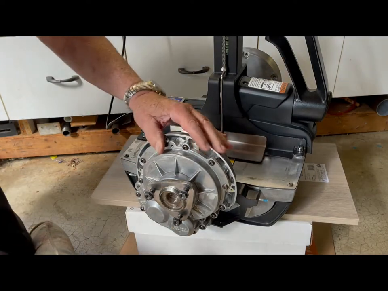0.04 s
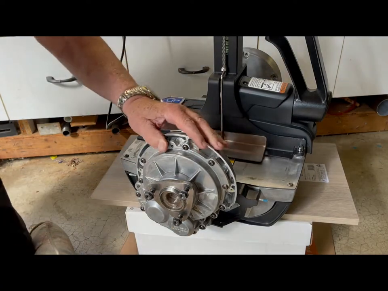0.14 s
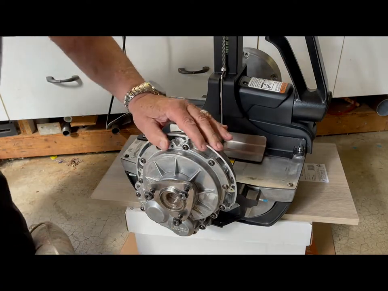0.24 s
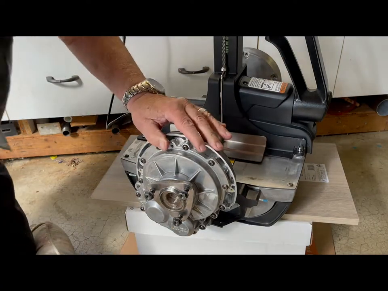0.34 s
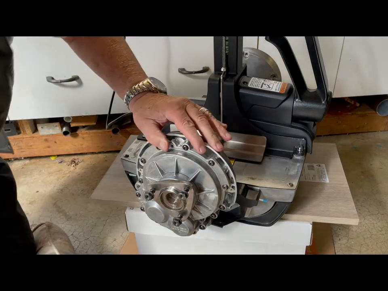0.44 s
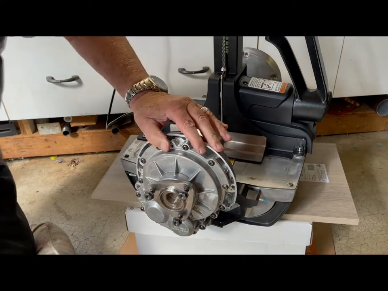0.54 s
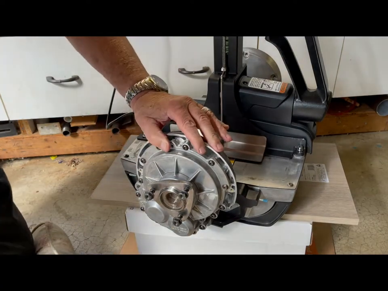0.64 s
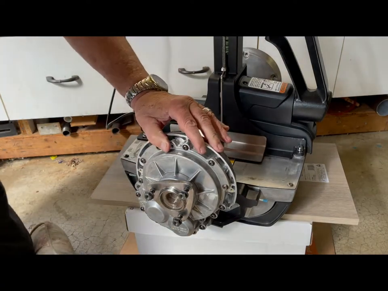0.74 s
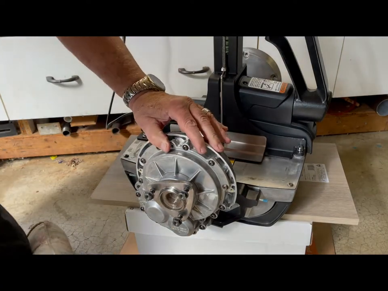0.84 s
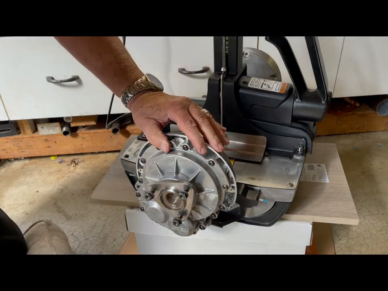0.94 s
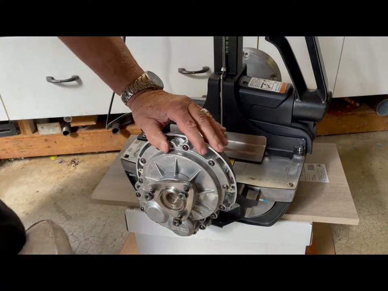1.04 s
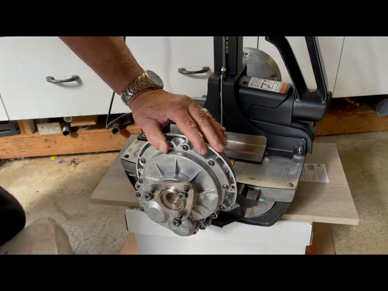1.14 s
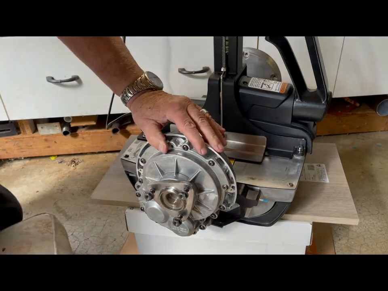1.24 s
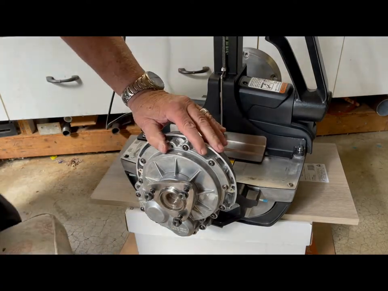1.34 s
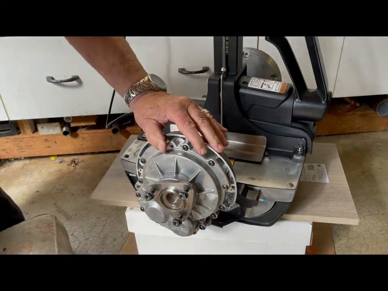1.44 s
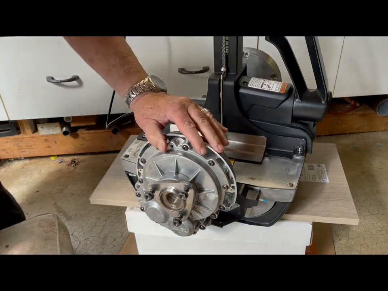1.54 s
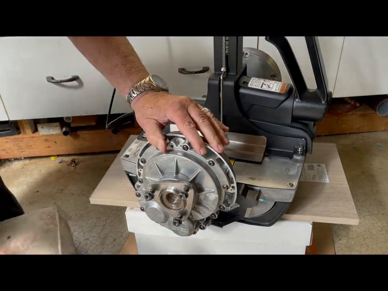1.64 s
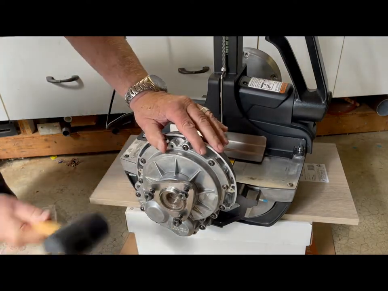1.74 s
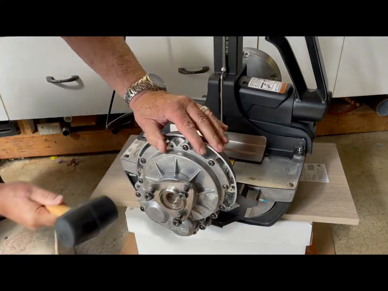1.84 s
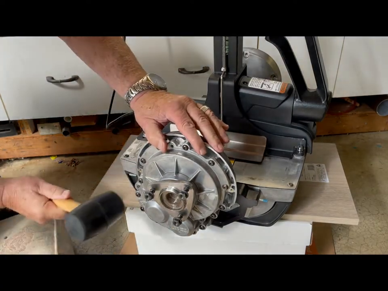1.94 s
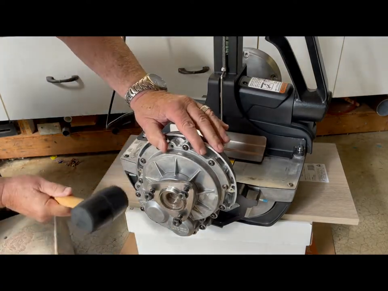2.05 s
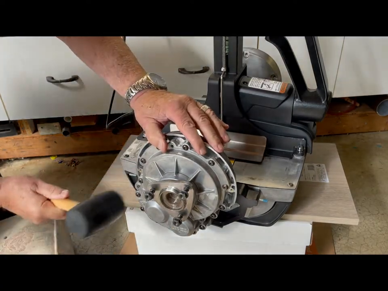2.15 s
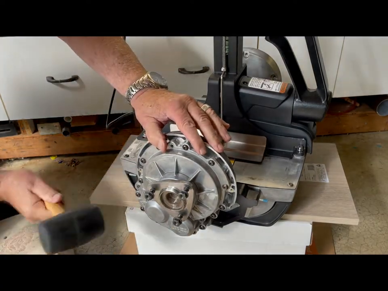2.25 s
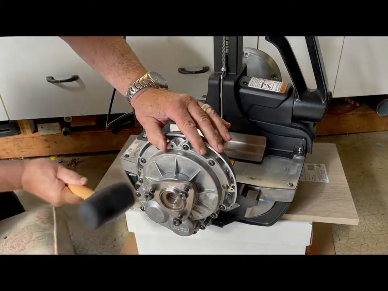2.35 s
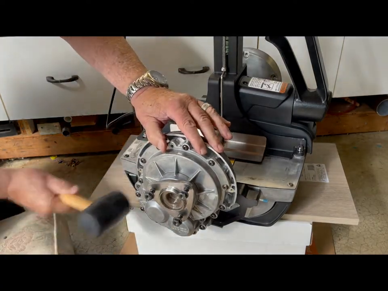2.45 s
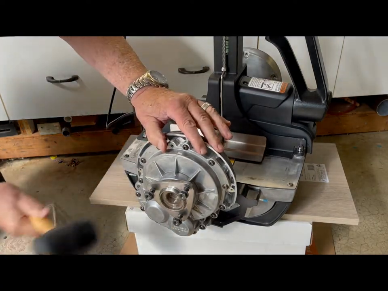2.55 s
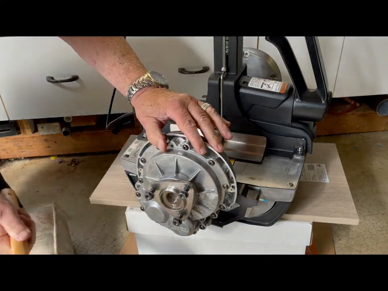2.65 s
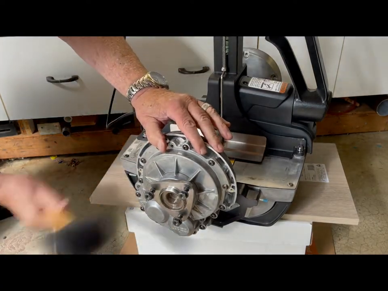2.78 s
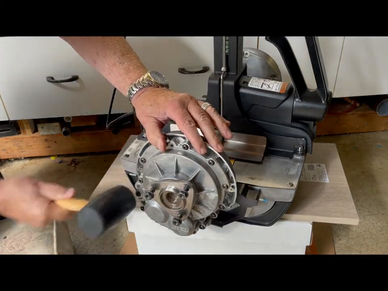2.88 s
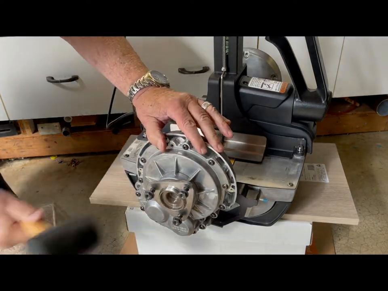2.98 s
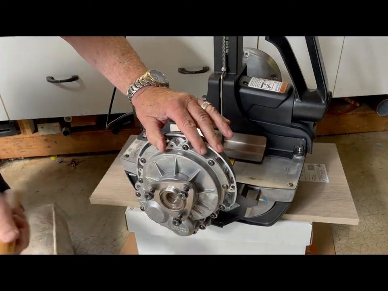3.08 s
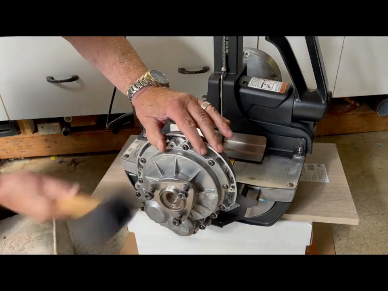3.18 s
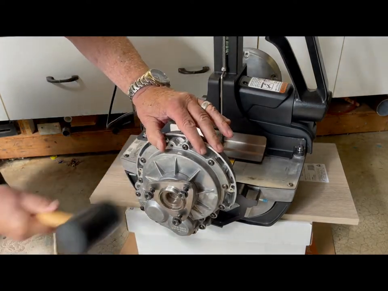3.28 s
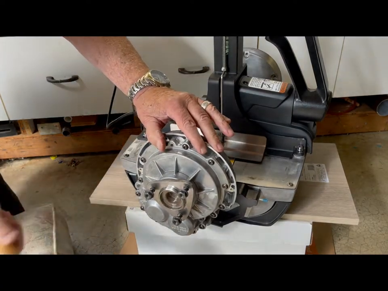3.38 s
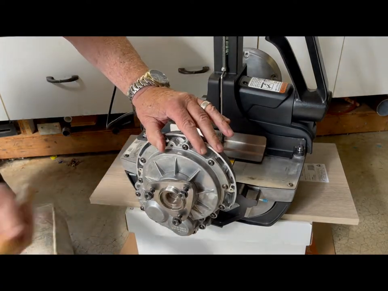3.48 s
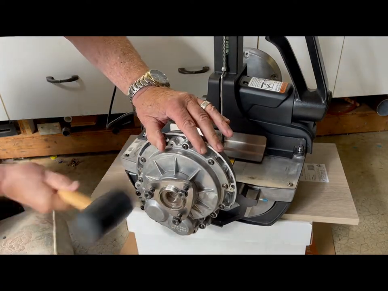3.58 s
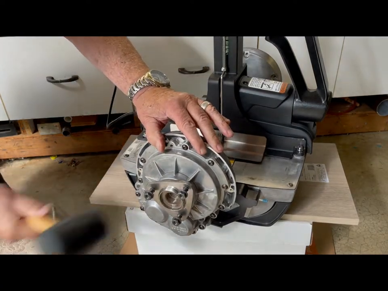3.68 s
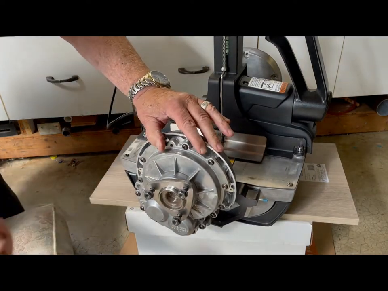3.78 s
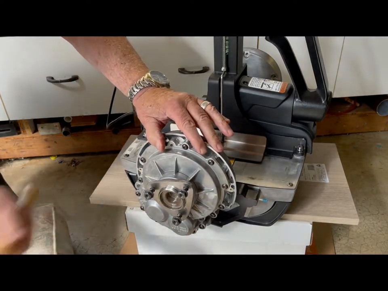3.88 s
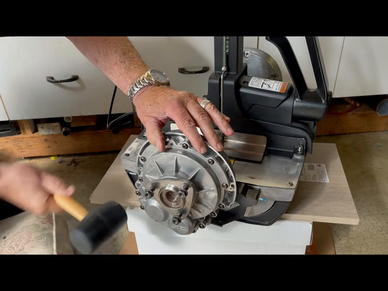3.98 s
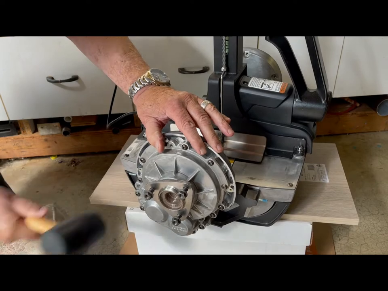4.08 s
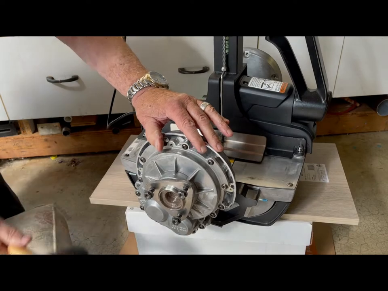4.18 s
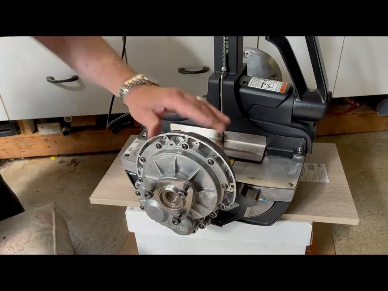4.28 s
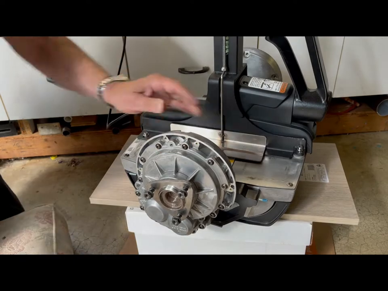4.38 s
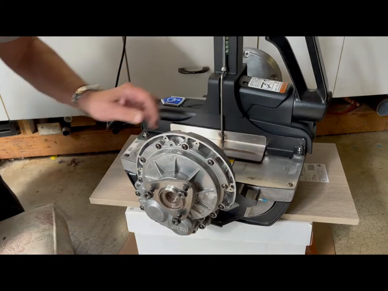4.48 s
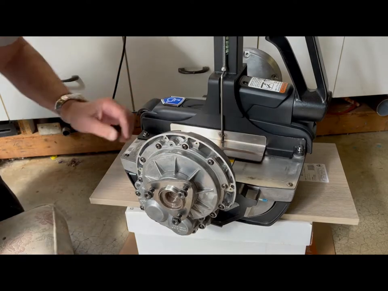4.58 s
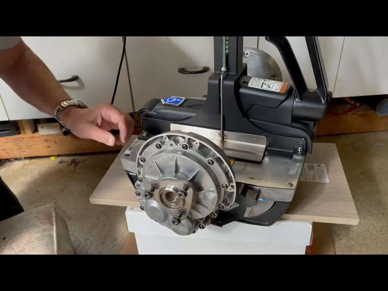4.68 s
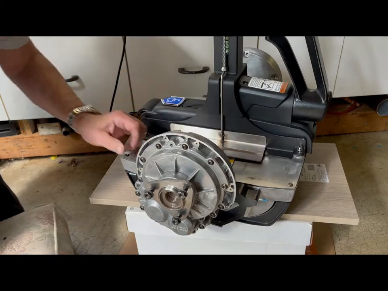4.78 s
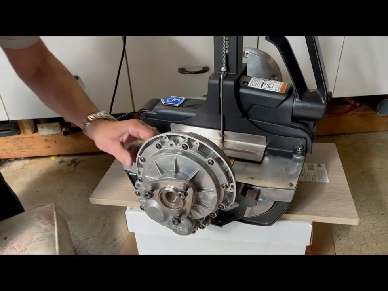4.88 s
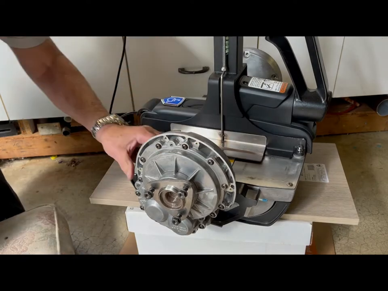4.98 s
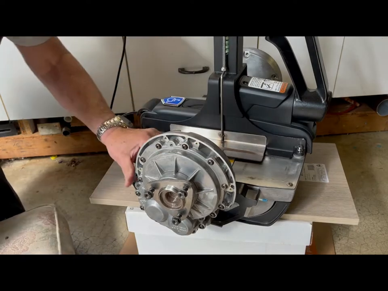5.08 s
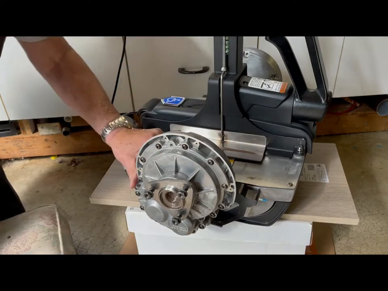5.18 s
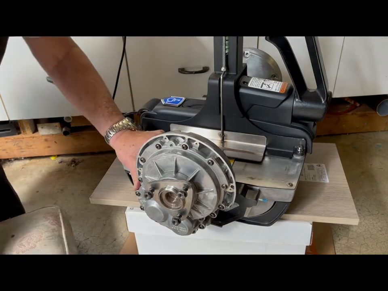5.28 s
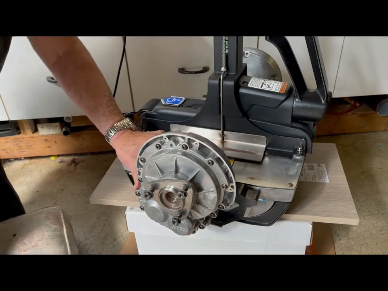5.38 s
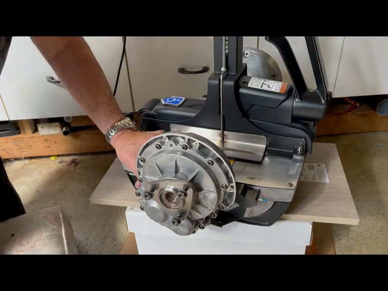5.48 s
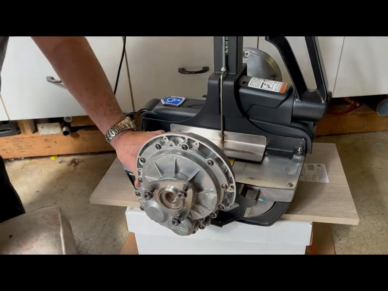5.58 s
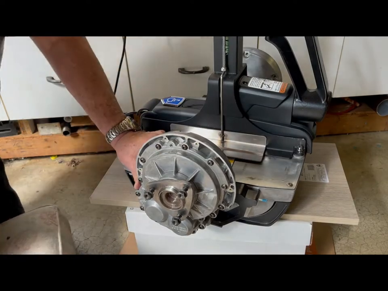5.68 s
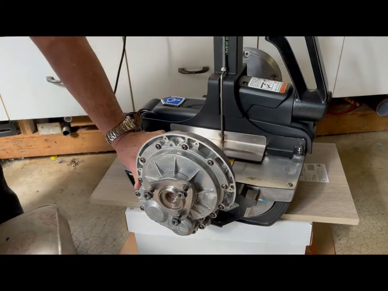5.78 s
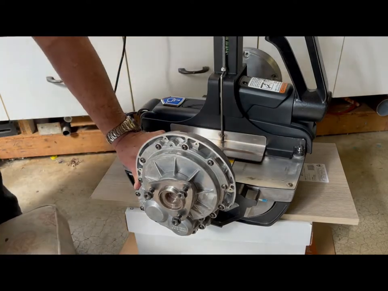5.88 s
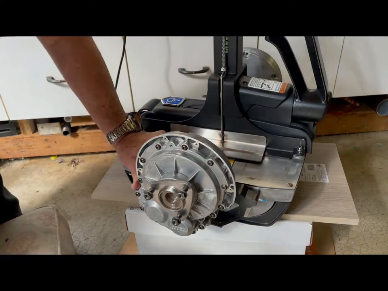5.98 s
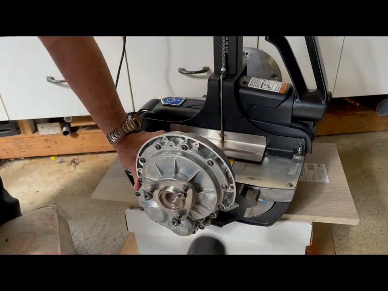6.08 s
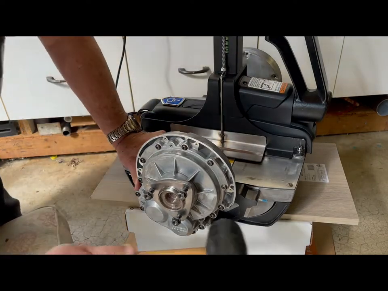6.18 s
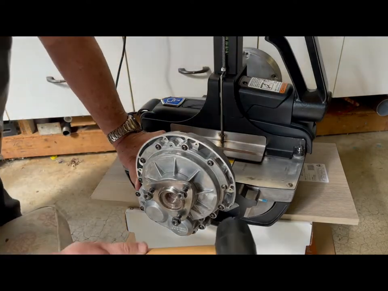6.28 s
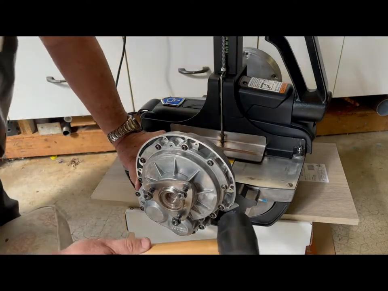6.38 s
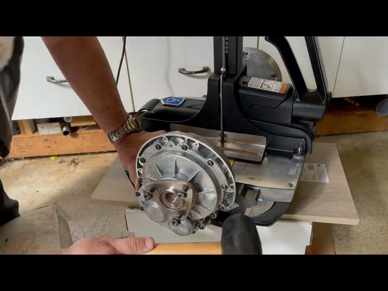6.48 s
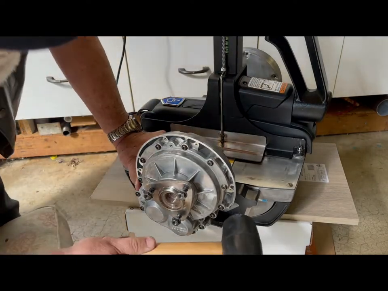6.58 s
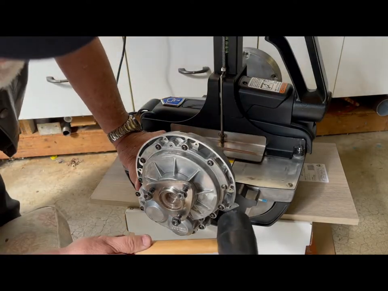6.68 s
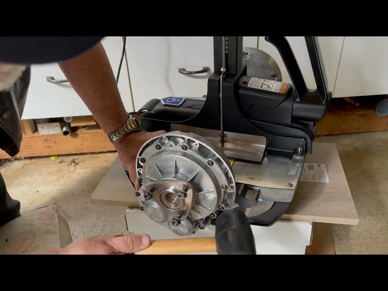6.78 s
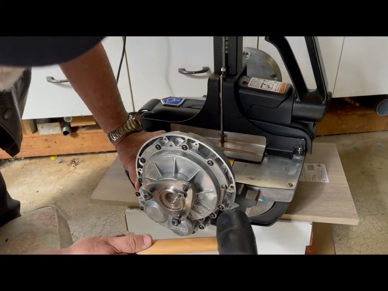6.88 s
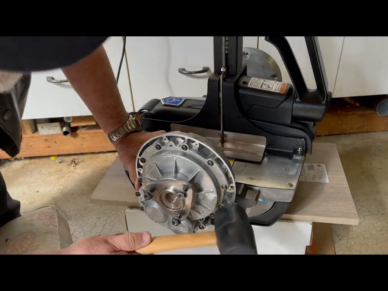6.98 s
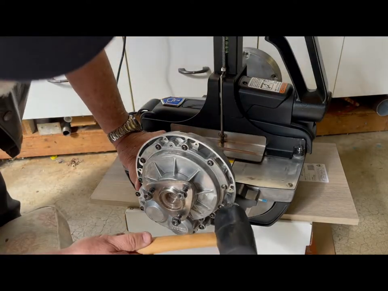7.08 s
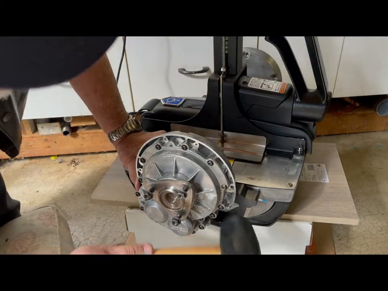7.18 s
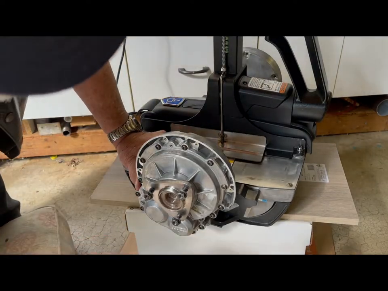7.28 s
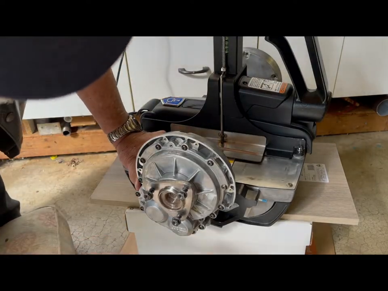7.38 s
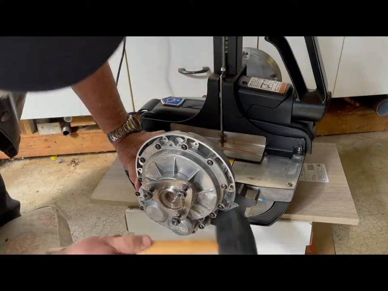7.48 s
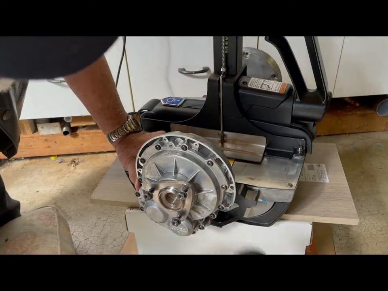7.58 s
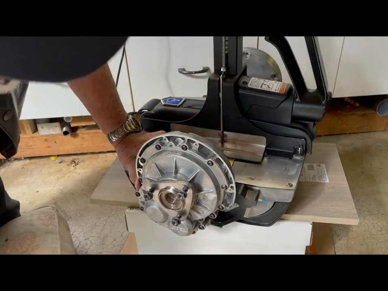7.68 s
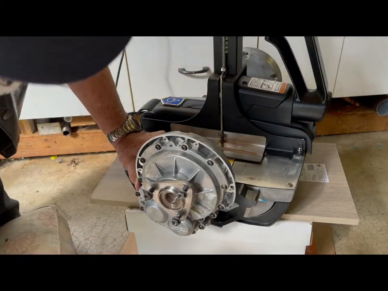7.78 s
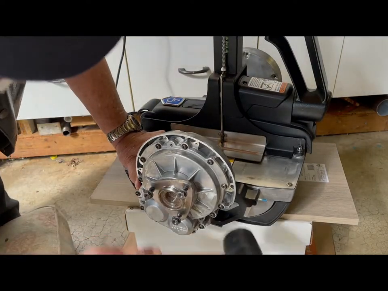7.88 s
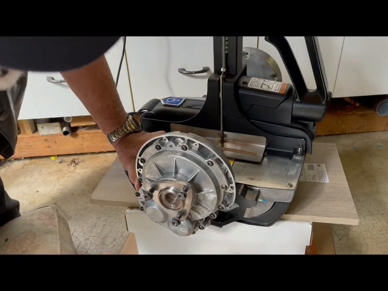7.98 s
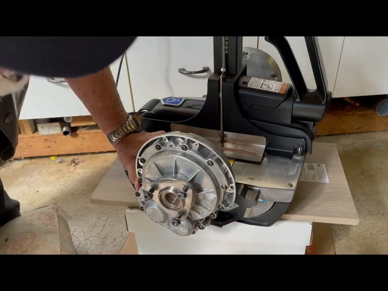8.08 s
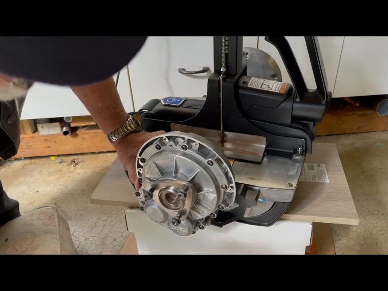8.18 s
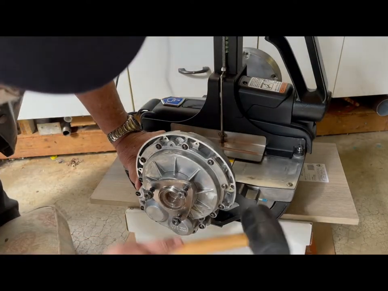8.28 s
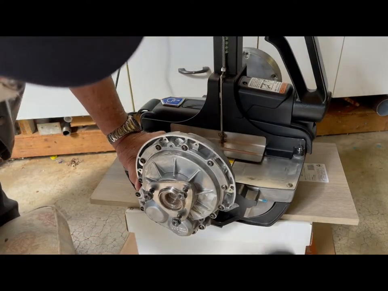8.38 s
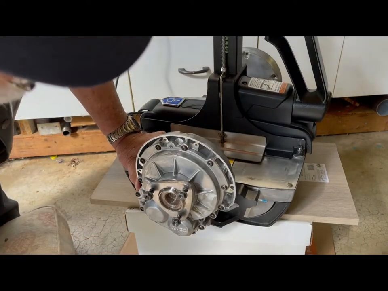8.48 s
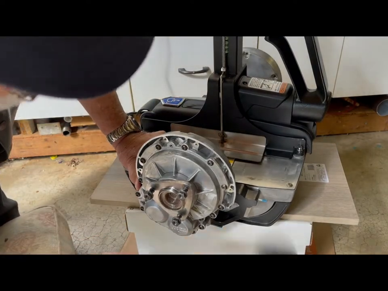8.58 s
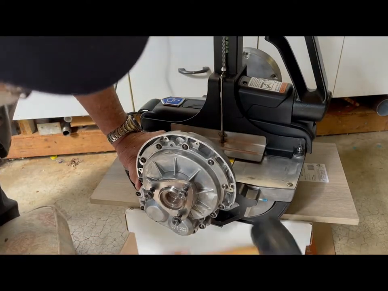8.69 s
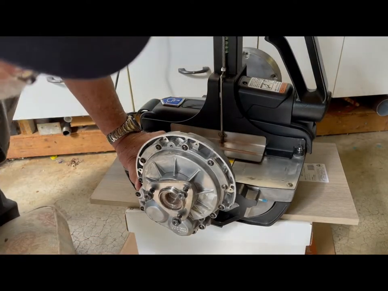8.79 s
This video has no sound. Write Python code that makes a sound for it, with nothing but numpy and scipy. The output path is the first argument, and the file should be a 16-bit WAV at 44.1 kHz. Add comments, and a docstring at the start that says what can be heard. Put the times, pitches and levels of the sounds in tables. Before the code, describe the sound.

A low, quiet rumble fills a small workshop. For the first two seconds clothes rustle and slide faintly, with a few soft bumps. At about 2.4 seconds a rubber mallet strikes a cast metal housing close by, lightly at first, then four times harder, at an even pace until 4 seconds. Each blow is a sharp knock with a rattle of loose metal parts, a short damped ring and a low thud from the stand. A very faint, thin high whistle sounds far off around 3 seconds. From 4.3 to 7 seconds there is only quiet handling: light clinks on the metal rim near 5 seconds, tiny watch band ticks, a brief palm rub and rustling cloth. The faint whistle returns around 7 seconds. From 7.5 seconds four more blows fall at the same pace, the first softer, the last at about 8.6 seconds.

```python
"""Over the low rumble of a small workshop, clothes rustle and slide, and knees and tool bump softly.
From 2.4 s a rubber mallet strikes a cast metal housing, steadied by hand on a saw table, five times.
Each blow rattles the loose metal parts, rings the damped casting and drives it down onto its stand.
A thin high whistle sounds far off. In the pause the hand clinks on the rim and the palm rubs the casting.
The whistle returns, and from 7.5 s four more blows fall."""
import sys
import numpy as np
from scipy import signal
from scipy.fft import rfft, irfft, next_fast_len
from scipy.io import wavfile
from scipy.ndimage import map_coordinates

SR = 44100
rng = np.random.default_rng(int(sys.argv[2]) if len(sys.argv) > 2 else 0)


def transcribe(signal):
    """Save signal, clipped to [-1, 1], as a 16-bit WAV file at the path in sys.argv[1]."""
    frames = np.atleast_2d(signal).T
    limited = np.clip(frames, -1, 1)
    pcm = np.round(limited * 32767).astype(np.int16)
    wavfile.write(sys.argv[1], SR, pcm)


N = 389830
NOW_S, AGE_S = np.arange(N) / SR, np.arange(SR) / SR  # scene clock, event clock

# room air: t/s, level/dB
AIR_LEVELS = [(2.2, -66), (6.23, -61.5), (6.91, -60.5), (8.6, -58.5)]
# room noise spectra: f/Hz, density/dB
RUMBLE_SPECTRUM = [(15, -55.5), (25, -26), (43, -6), (75, -5), (108, -0.5), (128, -2.5), (147, -12.5),
                   (179, -8), (236, -13), (275, -9.5), (401, -16.5), (584, -21), (700, -25.5), (910, -50.5),
                   (1540, -120)]
AIR_SPECTRUM = [(200, -25.5), (500, -1.5), (900, 4.5), (1400, -2), (2200, -12), (4000, -26.5), (8000, -34),
                (14000, -51.5)]
# room decay: f/Hz, t60/s
ROOM_DECAY = [(80, 0.59), (250, 0.22), (1000, .3), (3000, 0.27), (10000, 0.33), (13500, 0.047)]
# diffuse field: f/Hz, left-right coherence
COHERENCE = [(60, 1), (150, .88), (380, 0.27), (950, 0.079), (2400, 0.28), (6000, 0.73), (10000, 0.48)]
# far whistles: t/s, level/dB, f/Hz
WHISTLE_NOTES = [(3.1, -65, 7930), (3.16, -63, 8050), (3.39, -65.5, 8130), (6.99, -62.5, 8160),
                 (7.08, -62, 8310), (7.17, -59, 8330)]

# body shifting in its clothes: t/s, level/dB, half length/s, hiss over rustle/dB
BODY_MOVES = [(.02, -65, 0.11, 5.5), (.24, -62.5, 0.12, 5), (.41, -62, 0.11, 6), (.88, -65, 0.14, 1),
              (1.1, -55.5, 0.086, 3.5), (1.42, -63.5, 0.11, 4.5), (1.75, -63, 0.12, 6),
              (2.02, -67, 0.059, 2), (4.3, -81, .08, 10.5), (4.57, -68.5, 0.13, 1), (4.99, -66, 0.067, 7.5),
              (5.21, -60.5, 0.12, 4.5), (5.45, -65.5, 0.098, 4), (5.77, -60.5, 0.091, 6),
              (6.19, -68, 0.077, 5), (6.45, -84.5, 0.15, 7.5), (7.0, -72.5, 0.069, -13.5)]
# sleeve brushes: t/s, level/dB, half length/s
SLEEVE_BRUSHES = [(0.23, -50, .05), (0.497, -47.5, 0.084), (1.075, -51.5, 0.094), (1.176, -46.5, 0.034),
                  (1.648, -47, 0.056), (5.828, -65, 0.12)]
# cloth sliding on cloth: t/s, level/dB, rib rate/Hz
CLOTH_SLIDE = [(.93, -59, 176), (1.0, -38, 300), (1.04, -36.5, 340), (1.08, -34, 380), (1.11, -31, 560),
               (1.155, -33.5, 860), (1.19, -38, 840), (1.215, -47, 850), (1.24, -70, 580)]
# cloth spectra: f/Hz, density/dB
RUSTLE_SPECTRUM = [(500, -17.5), (1500, 0), (3000, -3), (6500, -6.5), (9000, -9), (14000, -26)]
HISS_SPECTRUM = [(4000, -43), (7000, -9.5), (8800, 0.5), (11000, 3), (11900, -9.5), (12700, -34.5)]
SLEEVE_SPECTRUM = [(100, -14), (280, -0.5), (700, -5.5), (1500, -18), (3000, -18.5), (7000, -21.5),
                   (10000, -13), (14000, -30)]

# palm on the casting: t/s, level/dB, half length/s
PALM_RUBS = [(4.575, -72, 0.072), (5.797, -58, 0.044), (6.197, -74, 0.089)]
# resonances under the palm: f/Hz, width/Hz, level/dB
PALM_MODES = [(2980, 130, -1), (4000, 100, -1), (5590, 38, 5), (6580, 110, 1), (7400, 62, -3)]
# touches on the rim: t/s, level/dB, rise/s, favoured f/Hz
RIM_CLINKS = [(2.415, -52.5, .002, 4400), (4.484, -60.5, 0.0035, 5230), (4.57, -63, .01, 3360),
              (5.008, -40.5, 0.0018, 1540), (5.025, -47, 0.0023, 1640), (5.171, -45.5, 0.0065, 3900),
              (5.181, -50, 0.0065, 2570)]
# metal watch band: t/s, level/dB
BAND_TICKS = [(0.481, -50), (2.019, -61), (2.077, -61.5), (4.372, -64), (4.434, -60), (4.651, -61),
              (5.816, -50.5)]
# body and tool bumps: t/s, level/dB, f/Hz, t60/s
SOFT_BUMPS = [(.191, -40.5, 172, 0.13), (.192, -50.5, 650, .04), (0.242, -36, 129, 0.056),
              (.268, -36, 45, 0.67), (0.34, -43.5, 167, 0.11), (.465, -37, 240, 0.34),
              (0.767, -54, 920, 0.049), (1.135, -36, 183, 0.042), (1.178, -37.5, 268, 0.086),
              (1.395, -43.5, 55, 0.063), (1.612, -39, 260, 0.15), (2.413, -39, 416, 0.069),
              (4.455, -48.5, 620, 0.1), (5.285, -51.5, 480, 0.072), (7.025, -45, 218, 0.13)]

# modes of the struck parts: f/Hz, level/dB, t60/s before extra damping
STAND_MODES = [(76, -1, 0.31), (112, -5, .12), (145, -1, 0.12)]
BOARD_MODES = [(172, 1, 0.13), (222, -6.5, 0.14), (253.1, 2.5, .11), (305, 1.5, 0.083),
               (318.2, -4.5, 0.056)]
CASTING_MODES = [(370, -7, 0.066), (459, -7, 0.087), (517, -2.5, 0.021), (571.3, -1, .06),
                 (645.7, -4.5, 0.064), (685, -1, 0.029), (784.4, -6.5, 0.069), (823, -6.5, 0.063)]
RIM_MODES = [(887, 1.5, .06), (968.6, 2, 0.062), (1081, -5, 0.11), (1199, 1, 0.072), (1316, -3, 0.14),
             (1371, -2, 0.09), (1518, -2.5, 0.058), (1695, -5.5, 0.039), (1962, -1, 0.063),
             (2125, -8.5, 0.091)]
CLINK_MODES = [(1520, 2.5, 0.08), (1725, 0, .15), (2051, -3, 0.21), (2610, -7, .16), (2960, -4.5, 0.22),
               (3400, -8, 0.13), (3820, -9.5, 0.24), (5300, -8, 0.2)]
LOOSE_PART_MODES = [(2240, -5, .04), (2320, 2.5, 0.019), (2900, -2.5, 0.085), (2935, 4.5, .05),
                    (2990, 0, .035), (3370, -0.5, 0.023), (3804, -2, .05), (4060, -1, .04),
                    (4360, -11.5, .04), (5020, 1, 0.035), (5000, 0, 0.074), (5200, -9.5, 0.14)]
FREE_METAL_MODES = [(417, 2, 0.79), (522, -0.5, 1.5), (630, -6.5, 0.37), (907, 4.5, .3), (1370, -7.5, 0.85),
                    (1560, -2.5, .3), (2030, -5.5, .45), (2420, -10, 0.36), (3700, -12.5, 0.45)]
# metal contact spectra: f/Hz, density/dB
KNOCK_SPECTRUM = [(100, -18), (250, -1.5), (550, 2), (800, 1), (1200, -24)]
CRACK_SPECTRUM = [(500, -25), (950, 1), (1400, 1.5), (2100, -5.5), (3000, -23.5)]
CLACK_SPECTRUM = [(1000, -23), (2200, 0.5), (3400, -3), (4600, -3.5), (6500, -11.5), (9000, -24)]
TICK_SPECTRUM = [(3500, -28.5), (6500, -8), (8000, -1), (9400, 3), (11000, 2.5), (12200, -5),
                 (13200, -15.5), (16000, -23)]
BUZZ_SPECTRUM = [(400, -23.5), (1000, 1.5), (2400, 2), (4000, -10.5), (7000, -17), (10000, -11.5),
                 (14000, -25)]
# mallet blows: t/s, level/dB; relative level/dB of thud, board, casting, rim, clack, tick;
# favoured f/Hz of board, casting, clack
MALLET_BLOWS = [(2.366, -11.5, -19, -10.5, -15.5, -21.5, -25.5, -28, 192, 795, 2430),
                (2.836, -2, -24, -17, -8.5, -17, -26.5, -32.5, 255, 654, 2830),
                (3.214, -3, -31, -24, -12, -11.5, -14.5, -19, 167, 643, 2520),
                (3.586, -1, -25.5, -15.5, -6, -18, -25, -25, 271, 650, 2650),
                (3.969, -1.5, -24, -16, -9.5, -17, -23, -20.5, 274, 462, 2926),
                (7.488, -7.5, -18.5, -7.5, -4.5, -18.5, -21, -24.5, 260, 580, 5350),
                (7.868, -1, -20.5, -16, -7, -14.5, -20.5, -24.5, 260, 457, 3404),
                (8.266, 1, -22, -19, -12.5, -18, -16.5, -26, 319, 430, 3160),
                (8.647, -2, -17.5, -13, -11.5, -15.5, -14, -21, 168, 410, 3680)]

# microphone port response: f/Hz, gain/dB
PORT_GAIN = [(25, -11), (60, 0), (8000, -0.5), (9900, 4.5), (10230, -6.5), (10550, 6.5), (11500, -3.5),
             (12400, -10), (13800, -25), (15500, -23)]
# left over right, before side weights: f/Hz, gain/dB
PORT_TILT = [(60, 1), (200, 1.5), (1000, 2.5), (2400, 1.4), (4400, 4), (8000, -0.5)]
# the ports resonate near 10 kHz, a little apart: f/Hz, left lead/rad before side weights
PORT_LEAD = [(1500, 0), (2600, .9), (4500, .6), (6500, .3), (7600, .8), (8500, 0), (9500, -1.8),
             (10230, -np.pi), (11200, -4.2), (12000, -5.3), (13000, -6)]


def amp(db):
    """Decibels to gain."""
    return 10 ** (np.asarray(db) / 20)


def unit(x):
    """Scale to rms 1."""
    return x / np.sqrt(np.mean(x ** 2) + 1e-20)


def burst(x):
    """Scale to the energy of 20 ms at rms 1."""
    return x / np.sqrt(np.sum(x ** 2) / (.02 * SR) + 1e-20)


def along(points, hz):
    """Read (f/Hz, value) points on a log axis."""
    f, v = np.transpose(points)
    return np.interp(np.log(hz + 1), np.log(f + 1), v)


def curves(rows):
    """One per-sample curve for each column after t/s."""
    t_s, *columns = np.transpose(rows)
    return [np.interp(NOW_S, t_s, column) for column in columns]


def wobble(rate_hz):
    """Smooth random curve with knots at rate_hz."""
    return map_coordinates(rng.standard_normal(int(N * rate_hz / SR) + 4), [NOW_S * rate_hz])


def filtered(x, response):
    """Apply a complex frequency response."""
    n = x.shape[-1]
    padded = next_fast_len(n + 8192)
    return irfft(rfft(x, padded) * response(np.fft.rfftfreq(padded, 1 / SR)), padded)[..., :n]


def resonance(hz, centre_hz, width_hz):
    """Band-pass response, gain 1 at the centre."""
    return 1j * hz * width_hz / (centre_hz ** 2 - hz ** 2 + 1j * hz * width_hz)


def coloured(x, spectrum):
    """Shape by a spectrum; rms 1."""
    return unit(filtered(x, lambda hz: amp(along(spectrum, hz))))


def add(track, t_s, sound):
    """Mix a sound in at t_s."""
    part = track[..., max(round(t_s * SR), 0):][..., :sound.shape[-1]]
    part += sound[..., :part.shape[-1]]


def onset(age_s, rise_s):
    """Smooth rise from 0 to 1."""
    return 1 - np.exp(-(age_s / rise_s) ** 2)


def swell(rise_s, t60_s):
    """Envelope: rise, then exponential decay."""
    return onset(AGE_S, rise_s) * amp(-60 * AGE_S / t60_s)


def stroke(t_s, db, half_s):
    """Gaussian gain of a movement centred on t_s."""
    return amp(db) * np.exp(-((NOW_S - t_s) / half_s) ** 2 / 2)


def diffuse(size):
    """Stereo noise from all sides, most alike in the bass."""
    angle = lambda hz: np.arccos(np.clip(along(COHERENCE, hz), -1, 1)) / 2
    noise = rng.standard_normal((2, size))
    mid, side = filtered(noise, lambda hz: np.array([np.cos(angle(hz)), np.sin(angle(hz))]))
    return np.array([mid + side, mid - side])


def in_room(sound, near_db, wet_db):
    """Direct sound, quick echoes off table and cupboards, and the workshop's tail."""
    echoes = np.zeros(SR)
    echoes[(rng.uniform(.003, .022, size=24) * SR).astype(int)] = rng.standard_normal(size=24)
    near = signal.fftconvolve(sound, echoes / np.linalg.norm(echoes))[:SR]
    hz, t_s, bands = signal.stft(diffuse(SR), SR, nperseg=256)
    decay = amp(-60 * t_s / along(ROOM_DECAY, hz)[:, None])
    tail = signal.istft(bands * decay, SR, nperseg=256)[1][:, :SR] * onset(AGE_S, .01)
    far = signal.fftconvolve(sound[None], tail / np.linalg.norm(tail[0]), axes=1)[:, :SR]
    # side echoes reach the ports out of step, except in the bass
    side = filtered(near, lambda hz: .8j * hz / (hz + 500) / (1 + (hz / 5000) ** 2))
    return sound + amp(near_db) * np.array([near + side, near - side]) + amp(wet_db) * far


def workshop():
    """Low rumble and faint hum under slowly changing air noise."""
    air_db, = curves(AIR_LEVELS)
    hum = amp(-65 + 2 * wobble(5)) * np.sin(2 * np.pi * 78 * NOW_S + .5 * wobble(15))
    rumble = amp(-51.5) * coloured(diffuse(N), RUMBLE_SPECTRUM)
    return rumble + hum + amp(air_db + 4.5) * coloured(diffuse(N), AIR_SPECTRUM)


def whistles():
    """Thin, wavering notes that sag in pitch, like a far bird's."""
    out = np.zeros((2, N))
    for t_s, db, hz in WHISTLE_NOTES:
        pitch_hz = hz * (1 - .25 * np.minimum(AGE_S, .12) + .02 * wobble(500)[:SR])
        note = np.sin(2 * np.pi * np.cumsum(pitch_hz) / SR) * swell(rise_s=.005, t60_s=.67)
        add(out, t_s - .01, in_room(amp(db + 3) * note, near_db=-1.5, wet_db=-1))
    return out


def sleeve_swings(lag_s=.035, half_s=.11, hiss_db=4, fade_db_per_s=1.7):
    """One body move per blow; harder blows stir more cloth, later ones less."""
    first_s = MALLET_BLOWS[0][0]
    return [(t_s + lag_s, -63.5 + .33 * db - fade_db_per_s * (t_s - first_s), half_s, hiss_db)
            for t_s, db, *_ in MALLET_BLOWS]


def cloth_slide(grain):
    """Ribs of the weave catch unevenly and buzz; the pitch follows the sliding speed."""
    db, rib_hz = curves(CLOTH_SLIDE)
    phase = 2 * np.pi * np.cumsum(rib_hz * (1 + .2 * wobble(500))) / SR
    buzz = unit((np.sin(phase) + .11 * np.sin(2 * phase)) * amp(4.2 * wobble(200)))
    scuff = amp(-7) * coloured(diffuse(N) * grain, AIR_SPECTRUM)
    sliding = (NOW_S > CLOTH_SLIDE[0][0]) & (NOW_S < CLOTH_SLIDE[-1][0])
    return amp(db - 6.5) * sliding * (buzz + scuff)


def clothes(rest_db=-82.5):
    """Fibres rustle and hiss with each move and swing; sleeves brush, cloth slides."""
    rustle_power, hiss_power = amp(rest_db) ** 2, 0
    for t_s, db, half_s, hiss_db in list(BODY_MOVES) + sleeve_swings():
        power = stroke(t_s, db, half_s) ** 2
        rustle_power += power
        hiss_power += power * amp(hiss_db) ** 2
    grain = amp(1.3 * wobble(25) + 1.4 * wobble(300))
    friction = lambda spectrum: coloured(diffuse(N) * grain, spectrum)
    rustle = amp(2) * np.sqrt(rustle_power) * friction(RUSTLE_SPECTRUM)
    hiss = amp(1.1) * np.sqrt(hiss_power) * friction(HISS_SPECTRUM)
    brushes = sum(stroke(*row) for row in SLEEVE_BRUSHES) * friction(SLEEVE_SPECTRUM)
    return rustle + hiss + brushes + cloth_slide(grain)


def palm():
    """Skin drags over the casting and excites its high resonances."""
    metal = lambda f: sum(amp(db) * resonance(f, hz, width_hz) for hz, width_hz, db in PALM_MODES)
    drag = diffuse(N) * amp(3.9 * wobble(120))
    return sum(stroke(*row) for row in PALM_RUBS) * unit(filtered(drag, metal))


def ring(modes, rise_s, delay_s=0, damping=1, favour_hz=1, favour_db=0):
    """Decaying modes, varied per strike; the struck spot favours those near one pitch."""
    hz, db, t60_s = np.transpose(modes)[..., None]
    detune, phase_jitter, jitter_db = rng.standard_normal((3, len(modes), 1))
    age_s = np.maximum(AGE_S - delay_s, 0)
    nearness = np.exp(-(np.log(hz / favour_hz) / .15) ** 2)
    phase = .9 * phase_jitter + np.pi * np.arange(len(modes))[:, None] ** 2 / 2
    waves = np.sin(2 * np.pi * hz * (1 + .0087 * detune) * age_s + phase)
    gains = amp(db + favour_db * nearness + jitter_db - 60 * age_s * damping / t60_s)
    return burst(np.sum(gains * waves, axis=0) * onset(age_s, rise_s))


def chatter(spectrum, rise_s, t60_s, spiky):
    """A dying swarm of tiny metal contacts."""
    contacts = rng.standard_normal(SR) * np.exp(spiky * rng.standard_normal(SR))
    return burst(coloured(contacts, spectrum) * swell(rise_s, t60_s))


def handling():
    """The hand clinks on the rim and the rebounding mallet clicks on it once, a watch band ticks, knees and
    tool bump softly."""
    out = np.zeros((2, N))
    for t_s, db, rise_s, pitch_hz in RIM_CLINKS:
        clink = ring(CLINK_MODES, rise_s, favour_hz=pitch_hz, favour_db=7)
        clink += amp(-4.5) * chatter(CLACK_SPECTRUM, rise_s, t60_s=.07, spiky=.55)
        clink += amp(-5.5) * chatter(CRACK_SPECTRUM, rise_s, t60_s=.054, spiky=.5)
        add(out, t_s, in_room(amp(db - 5.5) * clink, near_db=-8.5, wet_db=-10.5))
    for t_s, db in BAND_TICKS:
        tick = chatter(TICK_SPECTRUM, rise_s=.00091, t60_s=.031, spiky=.71)
        add(out, t_s, in_room(amp(db) * tick, near_db=-24, wet_db=-9.5))
    for t_s, db, centre_hz, t60_s in SOFT_BUMPS:
        dull = lambda hz: resonance(hz, centre_hz, centre_hz / 2) / (1 + .2j * hz / centre_hz)
        bump = burst(filtered(rng.standard_normal(SR), dull) * swell(.0023, t60_s))
        add(out, t_s, in_room(amp(db - 2.5) * bump, near_db=-5, wet_db=-11))
    return out


def thud(delay_s, width_s):
    """The stand takes the blow late, as one low push, and shudders."""
    u = (AGE_S - delay_s) / width_s
    push = burst((2 * u ** 2 - 1) * np.exp(-u ** 2))
    return push + amp(-10) * ring(STAND_MODES, rise_s=.012, delay_s=.0041)


def rattle(pitch_hz, snap_share):
    """Loose parts clack: a first snap around one pitch, the rest a broad dying chatter."""
    contacts = chatter(CLACK_SPECTRUM, rise_s=.0024, t60_s=.02, spiky=.6)
    snap = burst(filtered(contacts, lambda hz: 1 + amp(2) * resonance(hz, pitch_hz, width_hz=600)))
    rest = chatter(CLACK_SPECTRUM, rise_s=.00092, t60_s=.091, spiky=.39)
    return burst(np.sqrt(snap_share) * snap + np.sqrt(1 - snap_share) * rest)


def mallet():
    """Loose parts rattle first; the heavier modes follow as the rubber squashes."""
    out = np.zeros((2, N))
    for (t_s, db, thud_db, board_db, casting_db, rim_db, clack_db, tick_db,
         board_hz, casting_hz, clack_hz) in MALLET_BLOWS:
        # harder metal contact: more snap, and the body follows sooner
        snap_share = np.clip((db + clack_db + 32.5) / 18, .05, .9)
        lag_s = .0035 * (1 - snap_share)
        blow = amp(thud_db + 1.04) * thud(delay_s=.01281 + lag_s, width_s=.0026)
        blow += amp(board_db + .2) * ring(BOARD_MODES, rise_s=.005, delay_s=.001 + lag_s,
                                          damping=1.4, favour_hz=board_hz, favour_db=5.5)
        blow += amp(casting_db - 4) * ring(CASTING_MODES, rise_s=.0035, delay_s=lag_s,
                                           damping=1.7, favour_hz=casting_hz, favour_db=8)
        blow += amp(casting_db - 10) * chatter(KNOCK_SPECTRUM, rise_s=.0041, t60_s=.078, spiky=.41)
        blow += amp(rim_db - 7) * ring(RIM_MODES, rise_s=.0017, damping=1.3)
        blow += amp(rim_db - 7) * chatter(CRACK_SPECTRUM, rise_s=.0022, t60_s=.054, spiky=.44)
        blow += amp(clack_db - 4.5) * rattle(clack_hz, snap_share)
        blow += amp(clack_db - 15) * ring(LOOSE_PART_MODES, rise_s=.0016, damping=2)
        blow += amp(tick_db - 3) * chatter(TICK_SPECTRUM, rise_s=.0011, t60_s=.055, spiky=.76)
        # less into the board: the metal sings and buzzes more freely
        free_db = rim_db + .59 * (rim_db - board_db)
        blow += amp(free_db - 25.5) * ring(FREE_METAL_MODES, rise_s=.003)
        blow += amp(free_db - 27.5) * chatter(BUZZ_SPECTRUM, rise_s=.0038, t60_s=.61, spiky=.34)
        add(out, t_s, in_room(amp(db - 1.41) * blow, near_db=-10, wet_db=-16))
    return out


def scene():
    """All sources at the microphone; the worker kneels on the left."""
    return mallet() + handling() + palm() + whistles() + workshop() + clothes() * amp([[1], [-1]])


def record(dry):
    """Two ports colour the sound unequally; peaks are rounded off and the band ends steeply."""
    def port(hz, side):
        gain = amp(along(PORT_GAIN, hz) + side * along(PORT_TILT, hz))
        return gain * np.exp(1j * side * along(PORT_LEAD, hz))

    ceiling, top_hz = .95, 15700
    stereo = filtered(dry, lambda hz: np.array([port(hz, side=.48), port(hz, side=-.6)]))
    rounded = stereo / (1 + np.abs(stereo / ceiling) ** 6) ** (1 / 6)
    return filtered(rounded, lambda hz: 1 / (1 + (hz / top_hz) ** 60))


dry = scene()
out = record(dry)
transcribe(out)
```